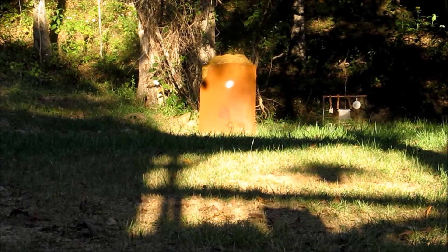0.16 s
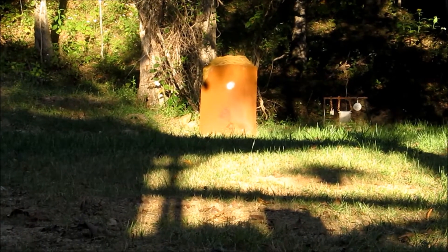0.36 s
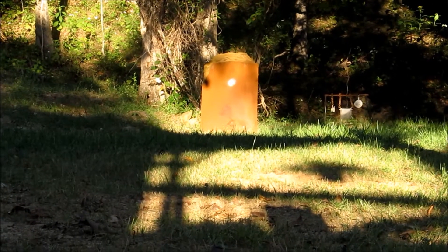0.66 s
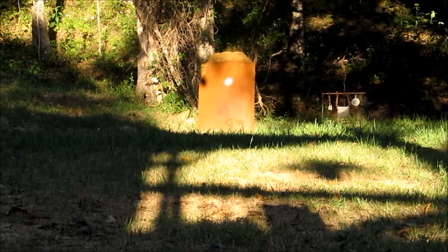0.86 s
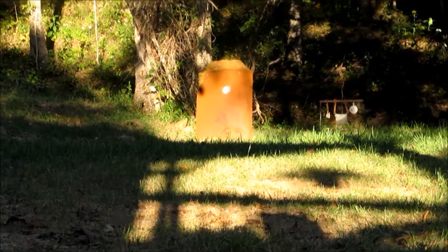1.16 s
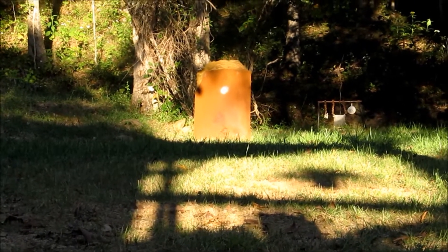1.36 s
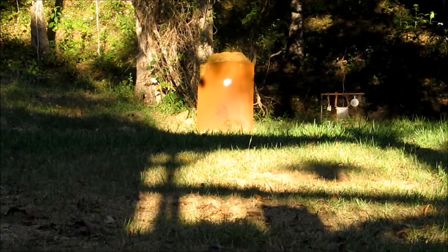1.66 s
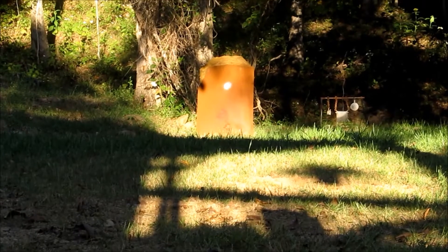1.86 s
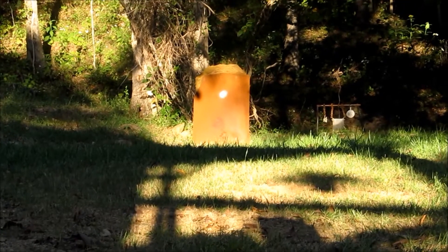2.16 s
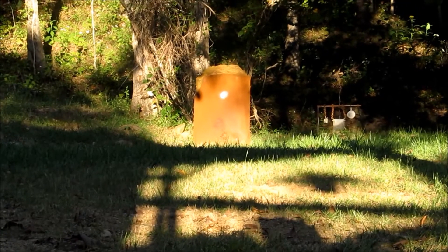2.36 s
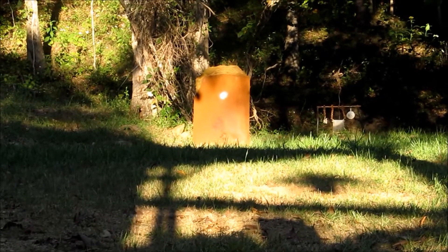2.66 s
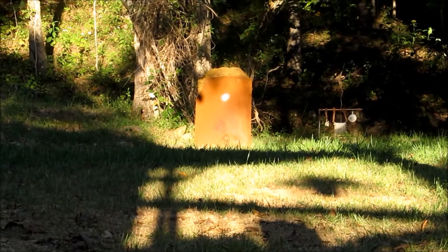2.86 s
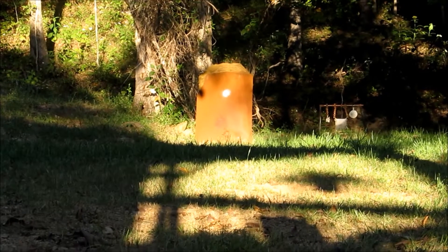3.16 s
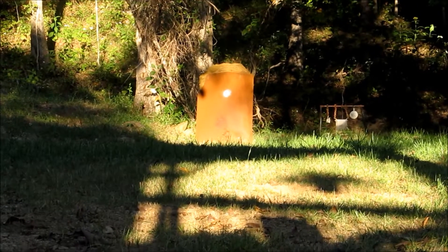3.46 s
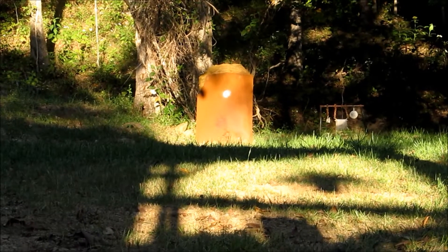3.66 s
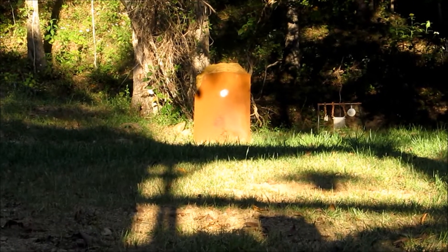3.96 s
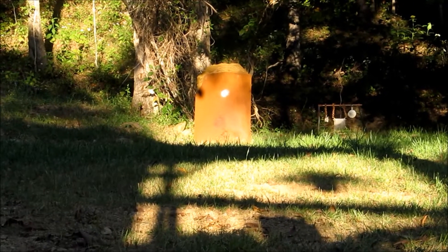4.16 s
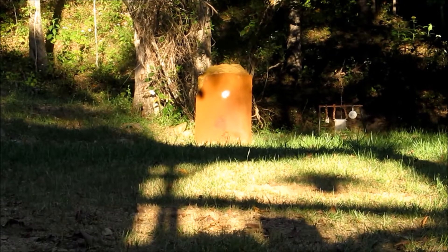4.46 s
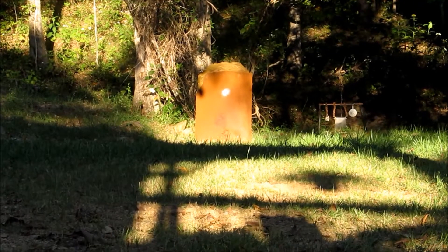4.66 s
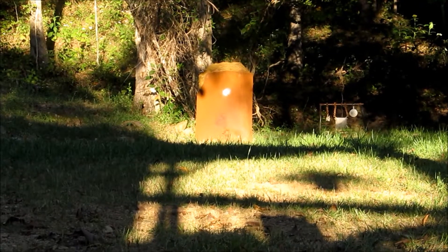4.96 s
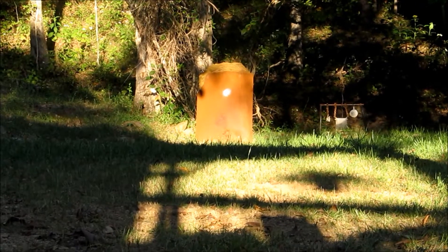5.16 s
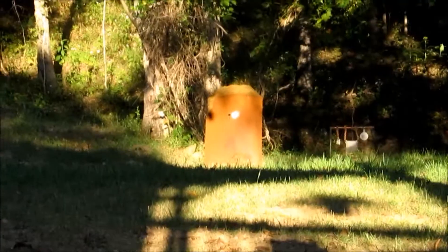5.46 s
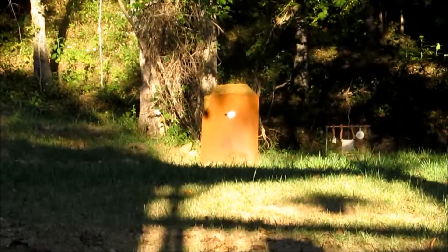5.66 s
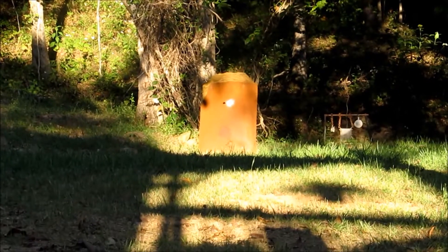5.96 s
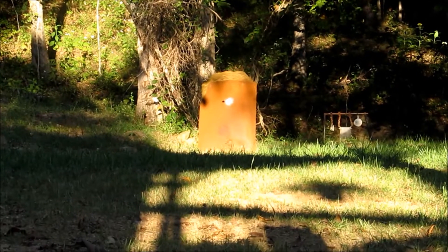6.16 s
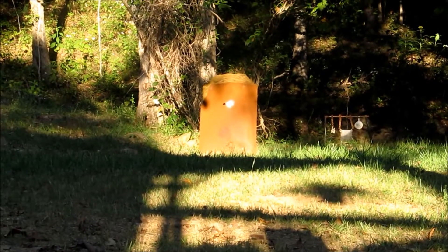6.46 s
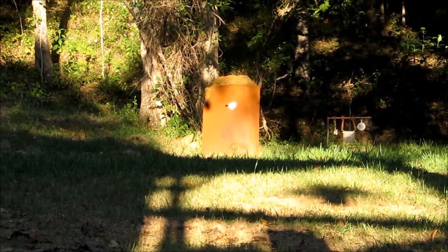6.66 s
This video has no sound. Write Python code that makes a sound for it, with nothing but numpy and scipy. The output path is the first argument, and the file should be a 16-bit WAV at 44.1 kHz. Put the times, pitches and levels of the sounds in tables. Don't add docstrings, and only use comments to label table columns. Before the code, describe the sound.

A crossbow close to the microphone in a grassy yard by woods: small bumps, a tap, a hollow knock, then a bright hard safety click. Bright cricket chirps and insect hiss run throughout above a faint low hum, dropping suddenly after each loud snap and swelling back. The shot is the loudest event, a violent snap with short woody ringing, rattling parts, a soft distant impact and, a second later, one small tick.

```python
import sys
import numpy as np
from scipy import signal
from scipy.fft import rfft, irfft
from scipy.io import wavfile
from scipy.ndimage import uniform_filter1d

SR = 44100
rng = np.random.default_rng(int(sys.argv[2]) if len(sys.argv) > 2 else 0)


def voltage_ratio(level):
    return 10 ** (np.asarray(level, float) / 20)


def log_audio(samples):
    frames = np.atleast_2d(samples).T
    limited = np.clip(frames, -1, 1)
    pcm = np.round(limited * 32767).astype(np.int16)
    wavfile.write(sys.argv[1], SR, pcm)


N = 300762

# (time [s], level [dB], colour (frequency [Hz], density [dB per Hz]),
# decay (frequency [Hz], t60 [s]), modes (frequency [Hz], level [dB], t60 [s]), left-right [dB])
SHOT = (5.3103, -5.5, [(59, -52.5), (100, -21.5), (431, -15), (1670, -5), (2110, -1), (3300, -8.5),
         (3900, -5), (4720, -11), (7220, -13.5), (8920, -16.5), (9710, -21), (14200, -30), (15800, -31)],
         [(200, 0.048), (1000, 0.034), (3000, .026), (8000, .03), (15000, .03)], [(2020, 7.5, 0.015),
         (3920, -9, .015), (1545, -12, 0.12)], -0.92)


def evened(x):
    return x / np.sqrt(np.mean(x ** 2) + 1e-20)


def read(points, hz):
    f, value = np.transpose(points)
    return np.interp(np.log(hz + 1), np.log(f + 1), value)


def add(mix, s, pair, pan_db, count=1):
    pair = pair * voltage_ratio([[pan_db / 2], [-pan_db / 2]])
    for side, late in enumerate((count, 0)):
        part = mix[side, round(s * SR) + late:][:pair.shape[1]]
        part += pair[side, :len(part)]


def resonate(x, hz, width):
    turn = np.exp(2j * np.pi * hz * np.arange(x.shape[-1]) / SR)
    r = np.exp(-np.pi * width / SR)
    once = signal.lfilter([1 - r], [1, -r], x / turn)
    twice = signal.lfilter([1 - r], [1, -r], once)
    return 2 * (turn * twice).real


def rings(modes, seconds, cycles=0.36):
    t = np.arange(round(seconds * SR)) / SR
    total = np.zeros(len(t))
    for (hz, db, t60), phase in zip(modes, rng.random(len(modes))):
        level = voltage_ratio(db - 60 * t / t60) * (1 - np.exp(-t * hz / cycles))
        total += level * np.sin(2 * np.pi * (hz * t + phase))
    return total


def yard():
    # (frequency [Hz], density [dB per Hz])
    hiss = [(18, -52), (30, -25), (111, -2.5), (183, -10), (232, -10), (483, -13), (1610, -20),
            (2800, -16.5), (3110, -22.5), (3700, -21.5), (4730, -12.5), (6830, -14), (7990, -36.5),
            (9600, -29.5), (14200, -36.5), (15800, -43)]
    # (frequency [Hz], coherence)
    likeness = [(60, -0.084), (130, 1), (290, 0.43), (640, 0.23), (1410, 0.05), (3100, -0.22),
                (6820, -0.098), (15000, 0.01)]
    # (frequency [Hz], left-right [dB])
    balance = [(60, -1), (110, -0.5), (200, 1), (380, 6), (700, 1.5), (1290, 3), (2380, 11.5), (4400, -3.5),
               (8120, -2.5), (15000, 0.5)]
    # (frequency [Hz], width [Hz], level [dB], left-right [dB])
    choruses = [
        (2100, 1000, -58, 14.5),
        (4780, 350, -57, -2.5),
        (6660, 500, -58.5, -2.5),
        (9300, 1300, -73, -2.5),
        (139.6, 21, -58, 1.5),
    ]
    # (frequency [Hz], width [Hz], level [dB])
    motor = [(236.4, 3.1, -51.5), (296, 4, -66.5)]
    hiss_db, edge_hz, edge_db = -44, 7700, 11

    frames, hz = N // 256 + 5, np.fft.rfftfreq(1024, 1 / SR)
    a, b, c, d, patches = rng.standard_normal((frames, 513, 5)).T
    patches = evened(uniform_filter1d(uniform_filter1d(patches, 10, 0), 12, 1))
    same = np.clip(read(likeness, hz), -1, 1)[:, None]
    left = a + 1j * b
    right = same * left + np.sqrt(1 - same ** 2) * (c + 1j * d)
    edge = edge_db * np.clip((hz - 6800) / 900, 0, 1) * (hz < edge_hz)
    colour_db = read(hiss, hz)[:, None] + 1.1 * patches + edge[:, None]
    sides = voltage_ratio(np.outer([.5, -.5], read(balance, hz)))[:, :, None]
    z = np.array([left, right]) * voltage_ratio(colour_db) * sides
    out = voltage_ratio(hiss_db) * evened(signal.istft(z, nperseg=1024, noverlap=768)[1][:, :N])
    for f, width, db, pan_db in choruses:
        band = evened(resonate(rng.standard_normal((2, N)), f, width))
        out += voltage_ratio(db) * voltage_ratio([[pan_db / 2], [-pan_db / 2]]) * band
    for f, width, db in motor:
        tone = np.sqrt(2) * np.sin(2 * np.pi * f * np.arange(N) / SR)
        out += voltage_ratio(db) * (tone + .25 * evened(resonate(rng.standard_normal(N), f, width)))
    return out


def far_cricket():
    # (middle [s], level [dB])
    far_chirps = [(.25, -49), (.67, -50), (1.1, -50.5), (1.6, -48.5), (2.05, -49), (2.47, -49.5),
                  (2.98, -48), (3.42, -51), (3.85, -47.5), (4.36, -50.5), (4.84, -49.5), (5.501, -57),
                  (5.93, -67), (6.3, -65), (6.751, -51)]
    seconds = .3
    t = np.arange(N) / SR
    level = sum(voltage_ratio(db) * np.cos(np.pi * np.clip((t - s) / seconds, -.5, .5)) for s, db in far_chirps)
    throb = 1 + 0.19 * np.sin(2 * np.pi * 23 * t)
    band = resonate(rng.standard_normal((2, N)), 4106, 310)
    return voltage_ratio([[-2.5], [2.5]]) * level * evened(throb * band)


def click(s, db, hz, t60, pan_db, sharp):
    t = np.arange(SR // 8) / SR
    a, b = rng.standard_normal((2, len(t)))
    puff = np.array([a, a + 0.31 * b]) * voltage_ratio(-60 * t / max(t60, .005))
    puff = np.diff(resonate(puff, hz, hz / sharp), prepend=0)
    return s, voltage_ratio(db) * puff / abs(puff).max(), pan_db


def high_insect():
    pips = [.2694, .5494, .8545, 1.1694, 1.4541, 1.7389, 2.0472, 2.9542, 3.1994, 3.454, 3.7434, 4.0243,
            4.3306, 4.5955, 4.9102, 5.1494]
    out = np.zeros((2, N))
    for s, w in zip(pips, rng.standard_normal(len(pips))):
        add(out, *click(s, -52, 9420 + 180 * w, .05, -2, sharp=24.0))
    return out


def cricket(strokes, seconds, hold, top, drop, slide, octave_db, echo_db, pan_db, count):
    out, t = np.zeros((2, N)), np.arange(round(seconds * SR)) / SR
    u = t / seconds
    shape = np.sin(np.pi * np.minimum(u / hold, 1)) ** 1.4
    shape = shape + slide * np.sin(np.pi * u) * (u > .8 * hold)
    for s, db, hz in strokes:
        turns = np.cumsum(hz * (1.008 - drop * (u - top) ** 2)) / SR + rng.random()
        stroke = np.sin(2 * np.pi * turns) + voltage_ratio(octave_db) * np.sin(4 * np.pi * turns)
        add(out, s, voltage_ratio(db) * shape * stroke * [[1], [1]], pan_db, count=count)
    tail = rng.standard_normal((2, 6000)) * voltage_ratio(-60 * np.arange(6000) / SR / .2)
    echo = signal.fftconvolve(out, tail / np.linalg.norm(tail[0]), axes=1)[:, :N]
    return out + voltage_ratio(echo_db) * echo


def second_cricket():
    # (time [s], level [dB], full strokes [count])
    second_chirps = [(0.219, -38, 2), (.504, -40, 2), (0.864, -36.5, 2), (1.192, -37, 2), (1.569, -41, 2),
                     (1.902, -40, 3), (2.325, -39, 3), (2.79, -37, 2), (3.092, -37.5, 2), (3.424, -40, 2),
                     (3.751, -38, 2), (4.109, -36.5, 2), (4.503, -38.5, 2), (4.863, -39.5, 2),
                     (5.192, -38, 2), (5.594, -47.5, 2), (5.91, -36, 2), (6.255, -37, 2), (6.685, -40.5, 2)]
    gap_s, soft_s, soft_db = .046, .04, -5
    strokes = [(s - soft_s, db + soft_db, 4500) for s, db, _ in second_chirps]
    for s, db, full in second_chirps:
        strokes += [(s - .006 + gap_s * k, db + 2.5, 4540) for k in range(round(full))]
    return cricket(strokes, .028, .5, top=.25, drop=.3, slide=.8, octave_db=-28, echo_db=-10,
                   pan_db=-3.0, count=4)


def near_cricket():
    # (time [s], gap to second stroke [s], lead-in below full [dB])
    near_chirps = [(0.2155, 0.043, 7.5), (0.5393, .0434, 4), (0.847, .0443, 12), (1.1348, 0.044, 6),
                   (1.4405, 0.047, 7), (1.729, 0.044, 12), (2.0043, 0.047, 8), (2.2936, .0449, 29),
                   (2.593, .0423, 30), (2.8967, 0.048, 8.5), (3.18, .0444, 7.5), (3.4859, 0.046, 30),
                   (3.7757, .0459, 30), (4.0671, .0468, 5), (4.364, .0443, 8), (4.6687, 0.045, 2.5),
                   (4.976, 0.041, 9), (5.2613, 0.04, 8), (5.576, .0434, 30), (5.9438, 0.046, 13),
                   (6.2656, 0.048, 7), (6.6038, .0419, 6)]
    full_db, full_hz, lead_s, flat_hz_per_db = -32.5, 4875, .0395, 13
    wobble_db, wobble_hz = .8, 8.7
    startle_s, startle_db = .35, -5
    strokes = []
    for (s, gap, soft), w in zip(near_chirps, rng.standard_normal((len(near_chirps), 4))):
        lead_db = full_db - soft
        strokes.append((s - lead_s - 0.033, lead_db - 8.5, 4600))
        strokes.append((s - lead_s, lead_db, full_hz - flat_hz_per_db * min(soft, 10)))
        timid_db = startle_db * (.1 < s - SHOT[0] < startle_s)
        for k in (0, 1):
            db = full_db + wobble_db * w[k] + timid_db
            strokes.append((s + k * gap, db, full_hz + wobble_hz * w[k + 2]))
    strokes = [(s - .0048, db, hz) for s, db, hz in strokes]
    return cricket(strokes, .031, .66, top=.33, drop=0.42, slide=.36, octave_db=-26, echo_db=-12.0,
                   pan_db=-2.5, count=2)


def gain_control_db():
    # (time [s], sudden drop [dB], further sink [dB], hold [s])
    ducks = [
        (2.227, 15, -0.9, 0.17),
        (5.315, 14.5, 9.5, 0.49),
    ]
    drop_s, sink_s, recover_db_per_s, ease_s, knee_db, rest_db = .012, .15, 20, 0.068, 5.5, -0.47
    out = np.full(N, rest_db)
    for s, drop_db, sink_db, hold in ducks:
        t = np.maximum(np.arange(N) / SR - s, 0)
        down = drop_db + sink_db * (1 - np.exp(-t / sink_s))
        up = recover_db_per_s * ease_s * np.logaddexp(0, (t - hold) / ease_s)
        out -= np.minimum(t / drop_s, 1) * knee_db * np.logaddexp(0, (down - up) / knee_db)
    return out


def woods():
    start_s, db, t60 = 5.4, -67, 3.0
    t = np.arange(N - round(start_s * SR)) / SR
    wash = evened(resonate(rng.standard_normal((2, len(t))), 900, 1800))
    return start_s, voltage_ratio(db - 60 * t / t60) * wash, 0


def slap(s, db, hz, hold, t60):
    t = np.arange(SR // 5) / SR
    level = (1 - np.exp(-t / .0015)) * voltage_ratio(db - 60 * np.maximum(t - hold, 0) / t60 - 100 * t)
    tone = np.sin(2 * np.pi * hz * t * (1 - .3 * t))
    return s, level * tone * [[1], [1]], 2.5 if hz > 300 else -4.0


def snap(s, db, colour, decay, modes, pan_db, same=0.49):
    size = SR // 3
    hz, t = np.fft.rfftfreq(size, 1 / SR), np.arange(size) / SR
    a, b = rng.standard_normal((2, size))
    z = rfft(np.array([a, same * a + np.sqrt(1 - same ** 2) * b]))
    centres, burst = np.geomspace(40, 18000, 24), 0
    place = np.interp(np.log(hz + 1), np.log(centres), np.arange(24))
    for k, centre in enumerate(centres):
        t60 = np.clip(read(decay, centre), .008, .5)
        shape = voltage_ratio(-60 * t / t60) * (1 - np.exp(-t * centre / 2))
        share = np.clip(1 - abs(place - k), 0, 1) * voltage_ratio(read(colour, hz))
        band = irfft(z * share, size) * shape
        burst = burst + band * np.linalg.norm(share) / np.linalg.norm(band)
    burst = burst / np.sqrt(np.mean(burst[:, :220] ** 2))
    return s, voltage_ratio(db) * (burst + 1.19 * rings(modes, size / SR)), pan_db


def bow():
    tap = (.9383, -20.5, [(120, -44), (200, -20), (455, -16), (1040, -15.5), (1700, 2), (3460, -10),
            (3800, -2), (4310, -15.5), (6450, -16), (7600, -20), (15800, -47)], [(400, 0.09), (1200, 0.031),
            (2000, 0.03), (4000, 0.015), (10000, .012)], [(1835, -1, 0.029), (2860, 0, 0.014),
            (3800, 1, 0.019), (1300, -23, 0.19), (422, -21.5, 0.13)], 1.6)
    knock = (1.2355, -23, [(180, -36), (300, -3.5), (545, -8), (735, -14), (812, -6.5), (1310, -17),
              (1520, -16), (2630, -27), (4410, -27), (15800, -58)], [(300, 0.058), (800, 0.093),
              (2000, 0.12), (6000, 0.091)], [(170, 0, 0.03), (540, 7.5, 0.065), (890, -5, .05),
              (30, -23, .7)], 0)
    safety = (2.221, -8.5, [(35, -54), (60, -26), (663, -22), (1030, -13), (1370, -12), (2330, -5.5),
               (2810, -4), (3390, -12.5), (3720, 2.5), (5400, -21), (7490, -12), (12800, -13),
               (15800, -29)], [(100, 0.073), (500, 0.054), (1200, 0.036), (2500, 0.014), (4000, 0.011),
               (12000, 0.0072)], [(2340, 0, 0.013), (1900, -3, .012), (926, -22, 0.04), (451, -31, .12)], -5)
    safety_echo = (2.228, -39, [(180, -40), (300, -13.5), (1090, -12.5), (1230, 1.5), (1400, -13),
                    (3170, -10), (11500, -28.5), (15000, -41.5)], [(500, 0.16), (3000, 0.088),
                    (12000, 0.12)], [(400, -17, 0.56)], -1)
    limbs = (5.319, -11.5, [(24, -64), (40, -38), (255, -23.5), (390, -9), (513, -12), (805, -11),
              (935, -29), (1140, -7.5), (1880, -12), (3350, -14), (3890, -15), (4300, -16.5), (7280, -21),
              (7840, -24), (15800, -45)], [(60, .3), (200, 0.16), (500, 0.086), (1500, 0.11), (4000, .075),
              (12000, .085)], [(420, -14, 0.15), (226.2, -4.5, .1), (643, -7, .12), (1140, -9.5, 0.1),
              (790, -9, .1)], 0)
    shot_echo = (5.33, -36.5, [(35, -44), (60, -17), (149, -4), (399, -13.5), (629, -4.5), (721, -20.5),
                  (886, -13.5), (970, -14.5), (6900, -24.5), (14000, -47)], [(100, .45), (700, 0.36),
                  (4000, 0.3), (12000, .22)], [(147, -10.5, .3)], 0)
    impact = (5.462, -41, [(59, -29), (100, -6), (1180, -6), (2140, -11), (2730, -11), (3010, -13),
               (3330, -21), (6850, -27), (12000, -54), (15600, -81), (22000, -120)], [(200, 0.048),
               (1000, 0.03), (3000, 0.018), (10000, 0.012)], [(151, -13, 0.068)], 15)
    tick = (6.3915, -36, [(350, -44), (600, -21), (1630, -7.5), (1910, -0.5), (2460, -10.5), (3750, -9.5),
             (5420, -21), (7150, -18), (14000, -50)], [(800, 0.043), (2000, 0.025), (5000, 0.023),
             (12000, 0.0145)], [(1240, -14, 0.11)], -3.1)
    # (start [s], level [dB], modes (frequency [Hz], level [dB], t60 [s]))
    safety_ring = (2.224, -46.5, [(483, -3, 0.24), (581, -12, 2), (845, -12, 0.7), (1028, -7.5, .4),
                    (1227, -3, .25), (1294, 0, 0.31), (3095, -13, 0.9), (3252, -11, .4)])
    string_ring = (5.33, -45, [(142, -4.5, 2.6), (285, -14, 2.5), (582, -2, 1.2), (624, -11, .4),
                    (1044, -2, .25), (1308, -4.5, .13), (473, -21, 1.2), (516, -20, 1.1), (698, -22, 1.3)])
    # (time [s], peak [dB], pitch [Hz], left-right [dB])
    rattles = [(1.2437, -22, 1530, 8), (1.2784, -37, 1200, 13), (5.3784, -37.5, 6700, -1),
               (5.3852, -32, 6700, -1), (5.3864, -40.5, 1520, 8.5), (5.4108, -37, 6790, -3.5),
               (5.4112, -38, 1750, 8.5), (5.4163, -44, 6220, -5), (5.435, -36.5, 6090, -1),
               (5.4352, -41, 1900, 9.5), (5.473, -40.5, 6060, -3), (5.4804, -44, 6100, -0.5),
               (5.5446, -51, 2100, -6), (6.424, -51, 2100, 4.0)]
    bumps = [(.254, -41.5, 528, 8), (0.26, -40, 138, 0), (0.283, -37, 140, -3), (.35, -35.5, 142, -2),
             (.508, -33.5, 170, -1), (.519, -43.5, 540, 9), (.754, -39, 240, 2), (.754, -40.5, 450, 12),
             (1.277, -29, 400, 10), (1.313, -37, 221, 10), (2.172, -35, 350, 12.0), (2.19, -36.5, 170, -4),
             (2.629, -45.5, 147, 0), (3.184, -45.5, 400, 14), (3.199, -46, 129, 2), (3.439, -37.5, 156, -1),
             (3.444, -38.5, 383, 11), (5.415, -35, 164, 2), (5.543, -45.5, 581, 5),
             (5.554, -39.5, 135, -2.5), (6.425, -49.5, 750, 7)]
    chatter = [(1.2388, -34, 10000, -3), (1.2448, -28, 7000, -3), (1.2765, -37, 7000, -2),
               (1.278, -44, 11000, -2), (1.287, -40, 1500, 5), (2.2225, -15, 2750, -3),
               (2.2252, -16, 3750, -3), (2.2245, -16, 1150, 5), (5.313, -6, 3900, -3),
               (5.3168, -15, 2400, -1), (5.3178, -10, 3800, -3), (5.3245, -13, 3900, -3),
               (5.3295, -16, 6200, -1), (5.333, -12, 3850, -3), (5.3405, -17, 3800, -3),
               (5.3505, -22, 3700, -2), (5.3555, -22, 1600, 0), (5.4175, -48, 11000, -2),
               (5.5445, -59, 6000, 0), (5.553, -59, 3000, 0)]
    # (time [s], level [dB], frequency [Hz], hold [s], t60 [s])
    slaps = [
        (5.3185, -12, 377, .02, .05),
        (1.2415, -10.5, 171, .006, .1),
    ]

    out = np.zeros((2, N))
    for hit in (tap, knock, safety, safety_echo, SHOT, limbs, shot_echo, impact, tick):
        add(out, *snap(*hit))
    for s, db, modes in (safety_ring, string_ring):
        add(out, s, voltage_ratio(db) * rings(modes, 1.8, cycles=3.5)[None] * [[1], [1]], -1.0)
    for s, db, hz, pan_db in rattles:
        add(out, *click(s, db - 3.0, hz, .01, pan_db, sharp=1.9))
    add(out, *woods())
    for s, db, hz, pan_db in bumps:
        add(out, *click(s - 1.1 / hz, db, hz, .062, pan_db, sharp=1.8))
    for s, db, hz, pan_db in chatter:
        add(out, *click(s, db, hz, .014, pan_db, sharp=4.0))
    for ring in slaps:
        add(out, *slap(*ring))
    return out


def scene():
    background = yard() + near_cricket() + second_cricket() + far_cricket() + high_insect()
    return background * voltage_ratio(gain_control_db()) + bow()


def top_cut(x):
    return signal.sosfilt(signal.butter(12, 15830, fs=SR, output="sos"), x)


def record(dry):
    edge = signal.firwin(511, 15780, window=("kaiser", 9), fs=SR)[None]
    limited = signal.oaconvolve(np.clip(dry, -1, 1), edge, "same")
    return top_cut(np.clip(limited, -1, 1))


dry = scene()
out = record(dry)
log_audio(out)
```